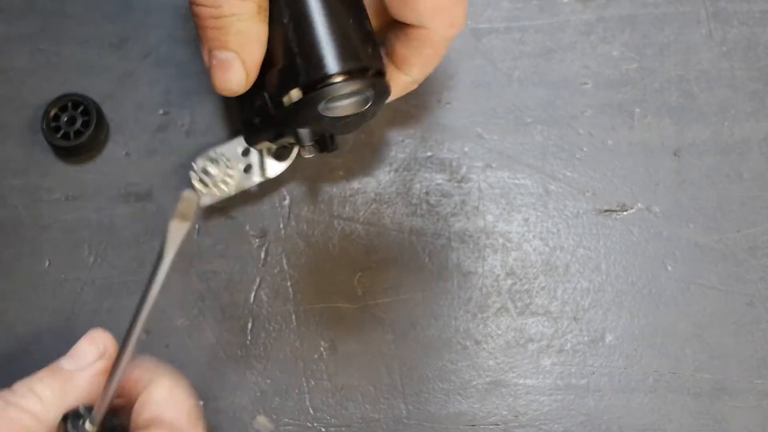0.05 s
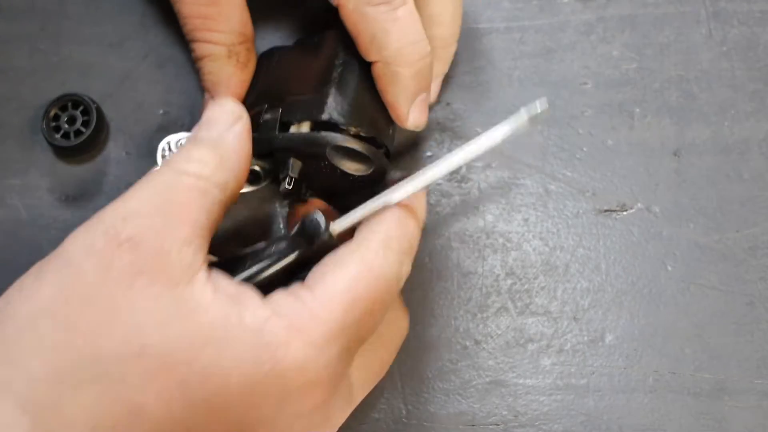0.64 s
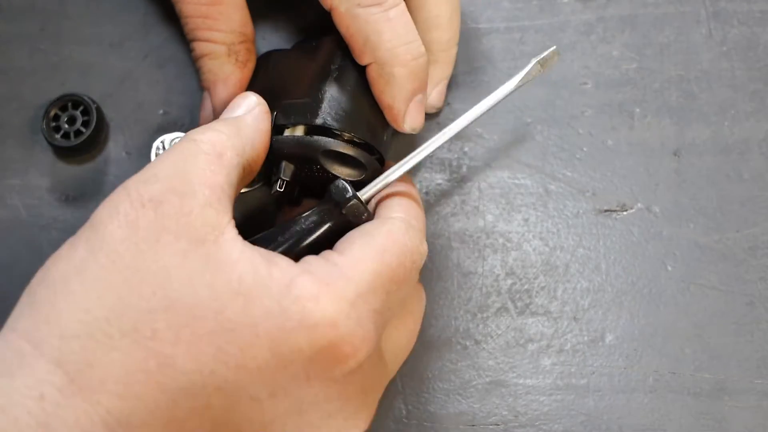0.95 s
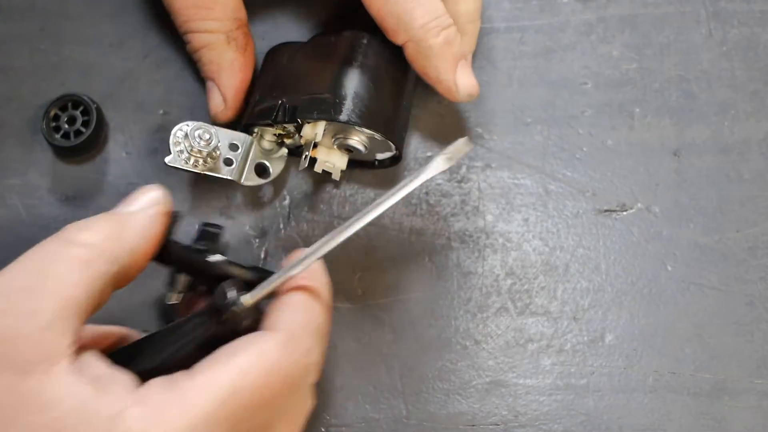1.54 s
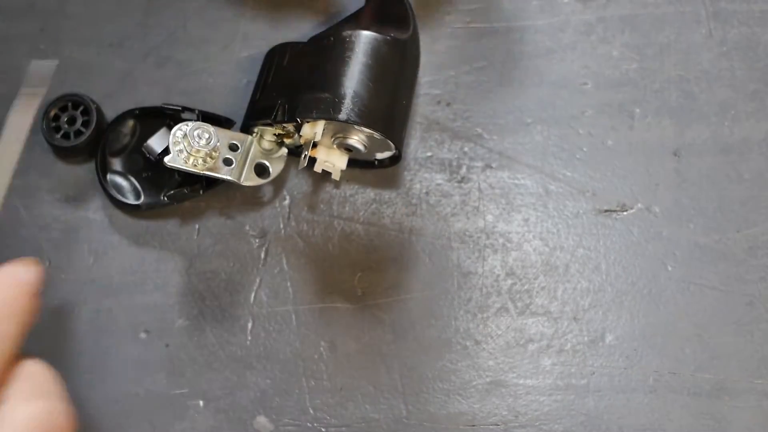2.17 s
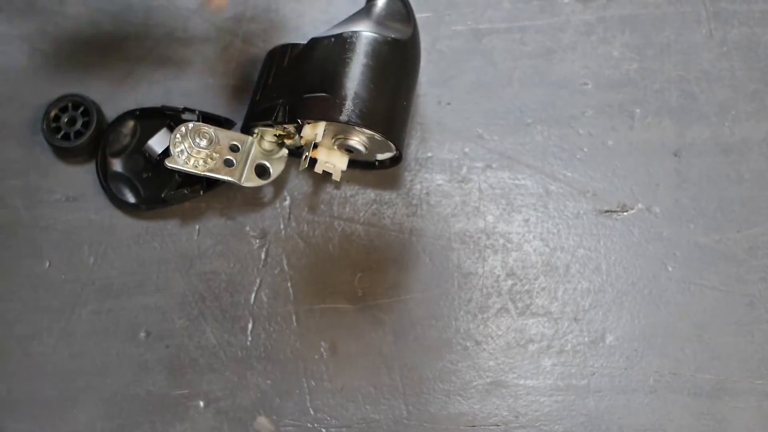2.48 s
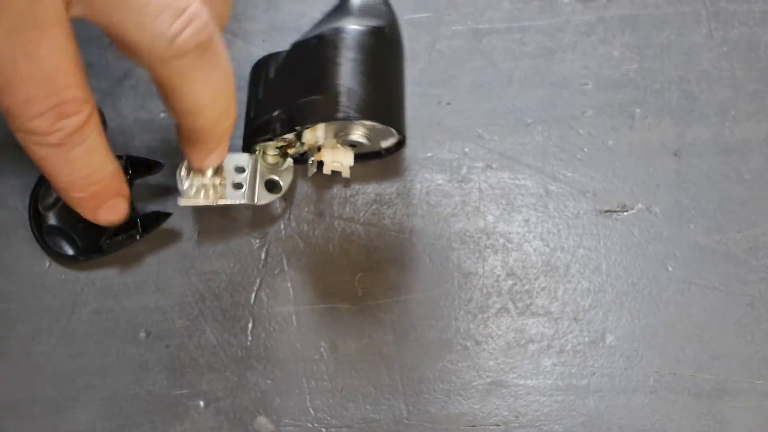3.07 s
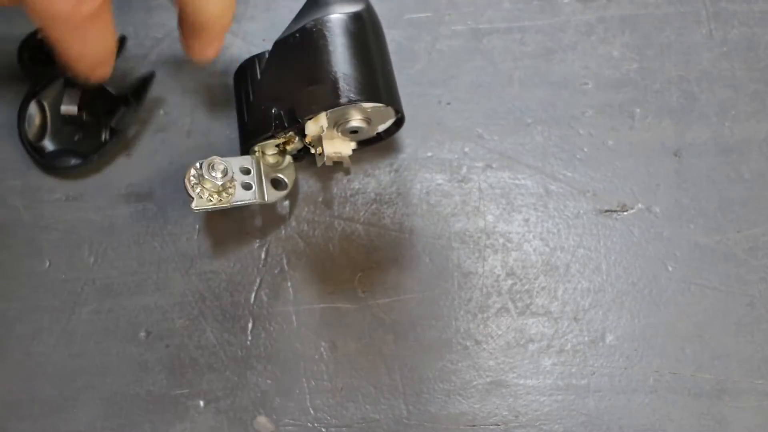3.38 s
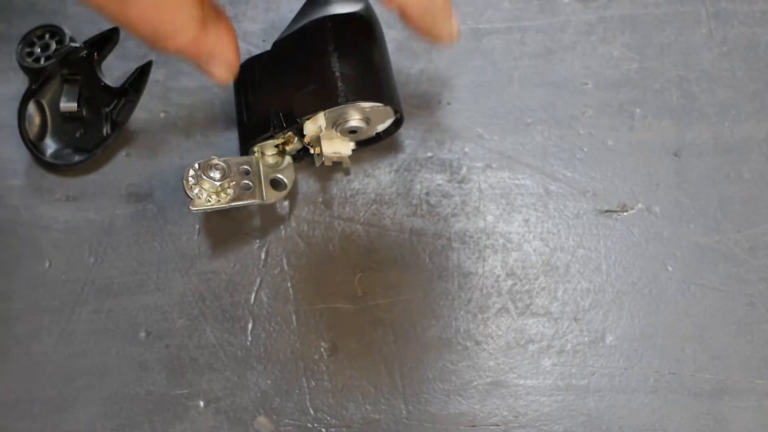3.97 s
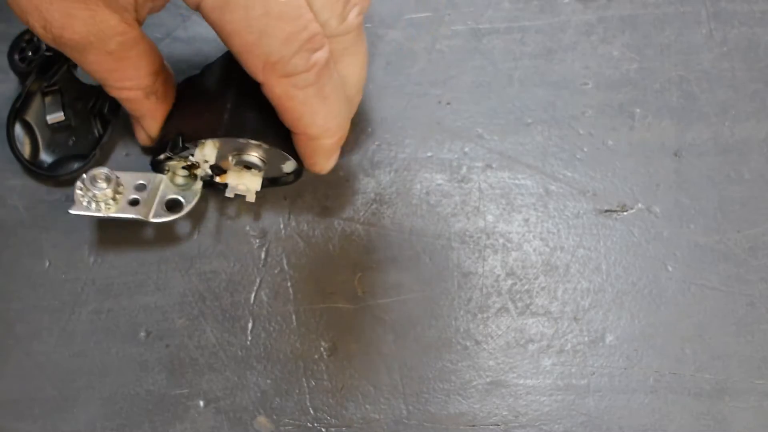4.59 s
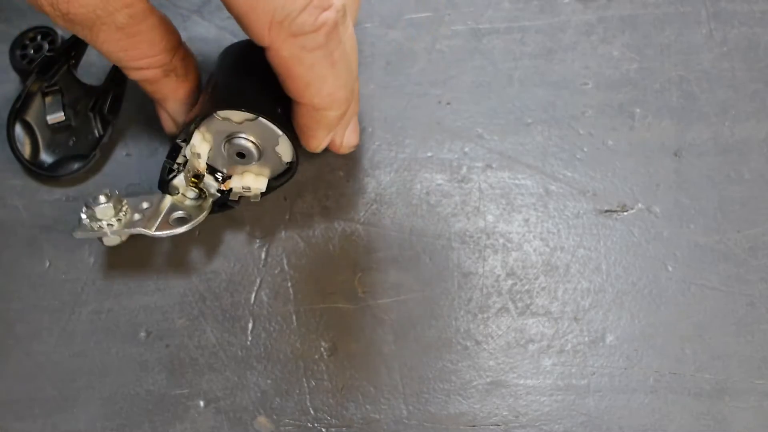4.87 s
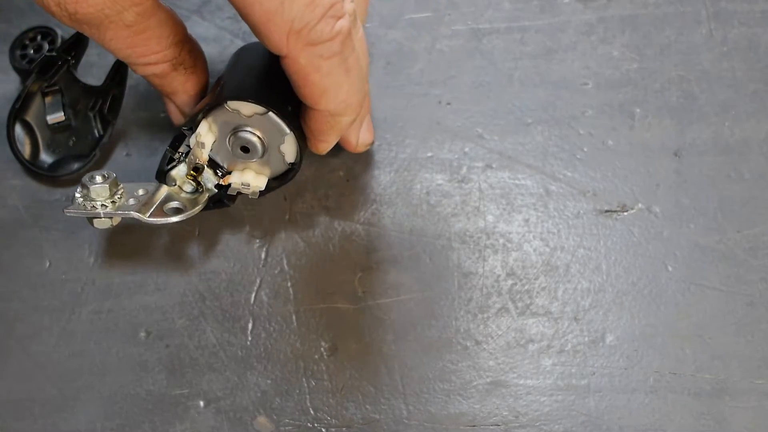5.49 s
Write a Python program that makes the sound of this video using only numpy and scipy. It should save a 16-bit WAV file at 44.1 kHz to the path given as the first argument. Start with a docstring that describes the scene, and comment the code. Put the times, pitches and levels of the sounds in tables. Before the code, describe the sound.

Soft rubbing and scraping open the sound as a small device is turned over on a workbench. It knocks firmly at about 0.3 seconds, leaving a spring inside ringing faintly, and knocks more lightly at 0.7. Around 1.1 seconds the catches of its plastic cover snap loose in a quick cluster of clicks. The cover drops at 1.8 and rattles briefly, then clacks and wobbles again from 2.7 as a finger pushes it aside. At 3 seconds a screwdriver lands with a loud clatter, its metal shaft bouncing. Its handle tumbles with dull thumps, mixed with a brushing rub and more plastic clacks, then rocks from 3.5 in quickening, fading bumps until about 4.3. A soft knock and faint scrapes follow, dying away by 5 seconds into quiet room tone. The microphone is close and the workshop small and dry.

```python
"""Prying a cover off at the workbench

A small device is turned over, knocking and scraping; a spring inside rings faintly after two knocks.
Its plastic cover is pried loose, drops and rattles. A screwdriver is put down, bounces and rocks to rest
on its handle while a finger pushes the cover aside. Each contact rings the resonances of the struck part;
hands brush the parts with a grainy rub and hiss. Close microphone, small dry workshop."""
import sys
import numpy as np
from scipy import signal
from scipy.fft import rfft, irfft
from scipy.io import wavfile
from scipy.ndimage import uniform_filter1d

SR = 44100
rng = np.random.default_rng(int(sys.argv[2]) if len(sys.argv) > 2 else 0)


def output_pcm(signal):
    """Save a mono or channel-first signal as 16-bit PCM at the path in sys.argv[1].

    Samples are clipped to [-1, 1] before scaling.
    """
    pcm = np.clip(np.atleast_2d(signal).T, -1, 1) * 32767
    wavfile.write(sys.argv[1], SR, np.round(pcm).astype(np.int16))


N = 252693
RING_TIME = np.arange(SR // 4) / SR   # seconds within one blow


def from_db(db):
    """Decibels to gain."""
    return 10 ** (np.asarray(db) / 20)


def unit_rms(x):
    """Scale to an RMS of one."""
    return x / np.sqrt(np.mean(x ** 2) + 1e-20)


def fade(t, t60):
    """Exponential decay by 60 dB in t60 seconds."""
    return np.exp(-np.log(1000) * t / t60)


def add(track, at_s, sound):
    """Mix a sound into a track at its cue."""
    start = int(round(at_s * SR))
    track[start:start + len(sound)] += sound[:N - start]


def band(x, low_hz, high_hz):
    """Causal band-pass."""
    return signal.sosfilt(signal.butter(2, [low_hz, high_hz], "band", fs=SR, output="sos"), x + 1e-18)


def noise(spectrum):
    """Steady noise of a given colour, at unit RMS."""
    hz, db = np.transpose(spectrum)
    bin_hz = np.maximum(np.arange(N // 2 + 1) * SR / N, 1)
    colour = from_db(np.interp(np.log(bin_hz), np.log(hz), db))
    return unit_rms(irfft(rfft(rng.standard_normal(N)) * colour, N))


def diffuse_tail(t60):
    """A cloud of noise that builds up and dies away; unit energy."""
    cloud = rng.standard_normal(len(RING_TIME)) * fade(RING_TIME, t60) * (1 - np.exp(-RING_TIME / .004))
    return cloud / np.linalg.norm(cloud)


# Colour of the workshop air: (frequency [Hz], relative level [dB])
AIR_COLOUR = [(15, -34), (25, -9.5), (70, 2), (97, -10.5), (134, -5.5), (277, -12.5), (384, -13.5),
              (476, -13), (962, -22), (1650, -25), (4030, -36.5), (14800, -40), (16000, -35.5)]

def room_tone(level_db=-68):
    """A quiet, steady bed of low rumble."""
    return from_db(level_db) * noise(AIR_COLOUR)


# Dark rub of skin: (frequency [Hz], relative level [dB])
RUB_COLOUR = [(71, -42.5), (120, -4.5), (220, -5.5), (269, 2.5), (414, -12), (468, -7.5), (812, -12.5),
              (1010, -13), (3000, -35.5), (3900, -43.5), (6600, -120)]
# Fine hiss of skin: (frequency [Hz], relative level [dB])
HISS_COLOUR = [(1060, -27.5), (1800, -0.5), (3230, -3.5), (3480, -4), (4210, -3.5), (5440, -8),
               (11000, -13.5), (14100, -21.5), (16000, -30.5)]
# Sliding strokes of hand or tool: (start [s], end [s], rub level [dB], hiss level [dB])
HAND_STROKES = [(0.0, 0.105, -83, -64.5), (0.07, 0.555, -63, -65), (0.513, 0.93, -58, -68),
                (1.472, 1.482, -56, -59), (1.714, 1.797, -62.5, -60.5), (1.2, 1.794, -63.5, -72),
                (1.825, 2.994, -63, -71), (2.156, 2.416, -65, -65), (3.266, 3.325, -37, -46),
                (3.322, 3.448, -43, -60.5), (3.418, 3.475, -52.5, -62), (4.359, 4.498, -55.5, -84),
                (4.484, 4.661, -63, -73.5), (4.776, 4.961, -59.5, -76)]

def hands(grip_rub_db=-68, grip_hiss_db=-76, grain_db=0.86, rest_s=4.4, rest_db_per_s=9):
    """Skin catches and slips: rub and hiss share one grain, swell with each stroke and come to rest."""
    t = np.arange(N) / SR
    activity = from_db(-rest_db_per_s * np.maximum(t - rest_s, 0))
    rub, hiss = from_db(grip_rub_db) * activity, from_db(grip_hiss_db) * activity
    for start, end, rub_db, hiss_db in HAND_STROKES:
        swell = np.sin(np.pi * np.clip((t - start) / (end - start), 0, 1))
        rub = np.hypot(rub, from_db(rub_db) * swell)
        hiss = np.hypot(hiss, from_db(hiss_db) * swell)
    grain = from_db(grain_db * unit_rms(uniform_filter1d(rng.standard_normal(N), size=300)))
    return grain * (rub * noise(RUB_COLOUR) + hiss * noise(HISS_COLOUR))


# Partials of the spring, the lowest two beating: (frequency [Hz], relative level [dB], t60 [s])
SPRING_MODES = [(336, 0, 3.4), (349, -7, 2.6), (474, -5, 1.0), (590, -3, 1.5), (624, -5, 1.2),
                (1250, -13, .5)]
# Knocks that shake it: (time [s], level [dB])
SPRING_KNOCKS = [(.317, -50.5), (1.122, -64)]

def spring():
    """A coil spring inside the device sings on after hard knocks."""
    out, t = np.zeros(N), np.arange(N) / SR
    note = sum(from_db(db) * fade(t, t60) * np.sin(2 * np.pi * hz * t) for hz, db, t60 in SPRING_MODES)
    for at_s, db in SPRING_KNOCKS:
        add(out, at_s, from_db(db) * note)
    return out


# Pings of small stiff parts: (time [s], pitch [Hz], level [dB], t60 [s])
PART_PINGS = [(.334, 4400, -44, 0.084), (.398, 4340, -44.5, 0.053), (1.1225, 3380, -23, 0.009),
              (1.154, 3380, -48, 0.016), (1.1225, 1110, -40, 0.057), (1.154, 1574, -26.5, 0.02),
              (1.417, 4400, -41, 0.012), (1.7977, 8540, -31, 0.011), (1.7977, 7900, -27.5, 0.0077),
              (1.7977, 4800, -28.5, 0.022), (1.8362, 4790, -20, 0.024), (1.837, 4260, -17.5, 0.012),
              (1.899, 2830, -37, 0.017), (1.927, 7830, -26, 0.0082), (2.7842, 4250, -30, 0.012),
              (3.4665, 4840, -37, 0.032), (4.338, 4320, -57.5, 0.035)]
# Booms of the bench top as weight settles on it: (time [s], pitch [Hz], level [dB], t60 [s])
BENCH_BOOMS = [(.179, 176, -22.5, 0.073), (.179, 94, -22.5, 0.073), (.219, 111, -31, 0.073),
               (.24, 180, -35, 0.13), (.379, 175.3, -25, 0.16), (2.785, 238.3, -30, 0.08),
               (3.2723, 119.9, -16, 0.096), (3.281, 176.3, -30.5, 0.48), (3.362, 190, -36, .07),
               (.3172, 790, -26, 0.033), (.3172, 267, -24.5, 0.12), (.7082, 790, -20, 0.02),
               (.7082, 347, -32.5, 0.041)]

def struck_modes(cues, rise_cycles=.6):
    """A ping or boom: each blow rings a single sine, which swells quickly and decays."""
    out, t = np.zeros(N), RING_TIME
    for at_s, hz, db, t60 in cues:
        envelope = (1 - np.exp(-t * hz / rise_cycles)) * fade(t, t60)
        add(out, at_s, from_db(db) * envelope * np.sin(2 * np.pi * hz * t))
    return out


def tap(modes, bench_db=-6, length=len(RING_TIME), spread_db=3.0, detune=.008, bench_echo_s=.00284):
    """A tap rings every mode, never twice alike; the wave returns inverted from the edge of the bench."""
    t = RING_TIME[:length]
    hz, width, db = np.transpose(modes)
    level_draw, pitch_draw = rng.standard_normal((2, len(hz)))
    gains = width * from_db(db + spread_db * level_draw)
    decays = np.exp(-np.minimum(np.pi * np.outer(width, t), 40))
    sines = np.sin(2 * np.pi * np.outer(hz * (1 + detune * pitch_draw), t))
    direct = gains @ (decays * sines)
    return direct - from_db(bench_db) * np.interp(t - bench_echo_s, t, direct, left=0)


# Ring of the housing's rim: (frequency [Hz], width [Hz], relative level [dB])
RIM_MODES = [(600, 150, -0.5), (830, 176, 5.5), (1280, 96, 5), (3200, 120, -11.5), (3625, 90, -22.5),
             (4220, 260, -19.5), (4900, 70, -29)]
# Drags across the bench: (start [s], end [s], level [dB], tilt [dB/octave])
HOUSING_DRAGS = [(0.0, 0.142, -64, 13), (0.124, 0.313, -64, 0), (4.532, 4.651, -63.5, 2.5),
                 (4.792, 4.952, -79, -17)]

def scrapes(slips_per_s=880):
    """The rim of the housing catches and slips on the bench; each slip rings it."""
    out, lowest_hz = np.zeros(N), RIM_MODES[0][0]
    for start, end, level_db, tilt in HOUSING_DRAGS:
        length = int((end - start) * SR)
        slips = rng.standard_normal(length) * (rng.random(length) < slips_per_s / SR)
        swell = np.sin(np.linspace(0, np.pi, length))
        rim = tap([(hz, width, db + tilt * np.log2(hz / lowest_hz)) for hz, width, db in RIM_MODES])
        scrape = signal.fftconvolve(slips * swell, rim)
        add(out, start, from_db(level_db) * scrape / np.std(scrape[:length]))
    return out


# The five registers of an impact (thud, knock, clack, click, edge) and their tails:
# (low [Hz], high [Hz], clutter send [dB], clutter t60 [s], room send [dB], room t60 [s])
IMPACT_REGISTERS = [(63, 460, -0.5, .11, -16, 0.2), (359.3, 1850, -5.5, 0.015, -6.5, 0.22),
                    (1860, 2800, -3, .02, -10.5, 0.074), (2970, 4810, -11, .031, -13, .25),
                    (5800, 14000, -2.5, .01, -8, 0.15)]
# How much hardness lifts each register, thud to edge: (share [0-1])
HARDNESS_SHARES = [0, 0.13, 0.5, 0.81, 1]

def impacts(hits, modes, colour_db, gentle_thud, echo_db, spot_db, bench_db, top_hz):
    """Contacts ring a body: hard ones click, gentle ones mostly thud; clutter and walls add tails."""
    firm_db, spot_q = -30, 1.7   # hits weaker than firm_db lean towards thud
    out, attack = np.zeros(N), int(.012 * SR)
    lowpass = signal.butter(2, top_hz, fs=SR)
    walls = [from_db(room_db) * diffuse_tail(room_t60) for *_, room_db, room_t60 in IMPACT_REGISTERS]
    for at_s, strength_db, hardness_db, spot_hz in hits:
        body = signal.lfilter(*lowpass, tap(modes, bench_db))
        blow = 0
        for k, (low_hz, high_hz, clutter_db, clutter_t60, _, _) in enumerate(IMPACT_REGISTERS):
            direct = (-1) ** k * band(body, low_hz, high_hz)   # alternate signs: bands join with no notch
            level_db = strength_db + colour_db[k] + HARDNESS_SHARES[k] * hardness_db
            if k == 0:
                level_db += gentle_thud * (firm_db - strength_db)
            echoes = from_db(echo_db) * (from_db(clutter_db) * diffuse_tail(clutter_t60) + walls[k])
            layer = direct + signal.fftconvolve(direct, echoes)[:len(RING_TIME)]
            blow = blow + from_db(level_db) * layer / np.std(layer[:attack])
        spot = signal.lfilter(*signal.iirpeak(spot_hz, spot_q, fs=SR), blow)   # pitch of the struck spot
        add(out, at_s, blow + from_db(spot_db) * spot)
    return out


# Voice of the housing: (frequency [Hz], width [Hz], relative level [dB])
HOUSING_MODES = [(75.5, 17, -0.5), (118, 15, -3.5), (187, 31, 7.5), (286, 70, 8.5), (341, 44, 12),
                 (480.5, 16, 5), (641, 47, 10.5), (790, 160, 10), (950, 130, -1), (1110, 100, 6),
                 (1361, 58, 1), (1556, 290, -5.5), (1880, 290, -9.5), (2384, 224, -7.5), (3160, 290, -4.5),
                 (3740, 200, -9), (4343, 490, -2), (4400, 39, -14.5), (7860, 3900, -4.5),
                 (13080, 8500, -8.5)]
# Knocks and snapping catches: (time [s], strength [dB], hardness [dB], spot pitch [Hz])
HOUSING_KNOCKS = [(.179, -51, 3, 550), (.204, -55, 17.5, 1240), (.317, -20, -12, 454), (.332, -43, 12, 600),
                  (.377, -42, -8, 185), (.391, -49.5, 14.5, 3200), (.708, -32.5, -12.5, 450),
                  (1.122, -31.5, -2.5, 3200), (1.141, -36.5, 0, 1130), (1.1535, -36, 4.5, 3200),
                  (1.186, -46, 6.5, 3350), (1.233, -56.5, 8, 295), (1.41, -40.5, -26, 470),
                  (1.653, -64.5, -21, 260), (1.679, -69.5, 13.5, 706), (4.3375, -48, -27, 700)]

def housing():
    """The device knocks on the bench and its catches let go, ringing the housing."""
    return impacts(HOUSING_KNOCKS, HOUSING_MODES, colour_db=[-6.5, -0.5, -11.5, -14.0, -21],
                   gentle_thud=0.58, echo_db=5.0, spot_db=-1.5, bench_db=-14.5, top_hz=17000)


# Voice of the plastic cover: (frequency [Hz], width [Hz], relative level [dB])
COVER_MODES = [(152, 39, -19.5), (260, 110, 4.5), (587, 37, 4), (830, 170, 6), (1090, 38, 4),
               (1300, 330, 6.5), (1637, 79, 1.5), (2130, 320, -3.5), (2784, 200, -4), (3150, 240, -4),
               (3650, 90, -3), (4050, 88, -6.5), (4420, 130, -5.5), (4857, 80, 2.5), (5460, 130, -16),
               (6743, 200, -13), (7400, 560, -7.5), (8600, 260, -4.5), (9410, 220, -2), (10100, 530, -9.5),
               (12300, 680, -14.5), (14530, 2500, -18)]
# Its clacks on the bench: (time [s], strength [dB], hardness [dB], spot pitch [Hz])
COVER_CLACKS = [(1.7975, -39.5, 3, 12190), (1.836, -43, 12.5, 4400), (1.851, -37.5, -18, 940),
                (1.8768, -39.5, -6.5, 964), (1.8948, -41, -1, 1090), (1.899, -45, 13, 3080),
                (1.927, -40, 3.5, 900), (1.9437, -53, 0, 900), (1.949, -55.5, 13, 920),
                (1.9555, -47.5, -8, 1010), (1.965, -45.5, -6.5, 3240), (1.9837, -59.5, 12.5, 1600),
                (2.723, -32, -10, 2480), (2.767, -56, 6, 11020), (2.7745, -37, -10, 1410),
                (2.7946, -44.5, -12.5, 1494), (2.8285, -47, -6, 1189), (2.8475, -34, -0.5, 2300),
                (2.87, -49, 1, 8300), (2.888, -43, -2, 2410), (2.905, -45.5, -4.5, 9680),
                (2.915, -41, -8.5, 1997), (3.261, -41.5, -2.5, 4050), (3.444, -43, -16, 2097),
                (3.4665, -36.5, -3, 2383), (3.487, -51, -1, 1406), (3.502, -46, -6, 1900),
                (3.5134, -55, 3.5, 8200)]

def cover():
    """The loose cover clacks as it falls, tips over and is pushed aside."""
    return impacts(COVER_CLACKS, COVER_MODES, colour_db=[-18, -5.0, -10.0, -7.5, -15.5],
                   gentle_thud=0.45, echo_db=4.5, spot_db=3.5, bench_db=-15, top_hz=17000)


# Wobbles of the cover:
# (start [s], end [s], first rate [taps/s], last rate [taps/s], first level [dB], last level [dB])
COVER_WOBBLES = [(1.975, 2.032, 140, 166, -45.5, -66.5), (2.734, 2.848, 96, 160, -50, -56.5),
                 (2.86, 2.953, 79, 160, -49.5, -54.5), (3.476, 3.558, 110, 130, -46, -58.5)]

def cover_chatter(band_hz=(500, 2200), spread_db=2.5, jitter=.15, room_db=-1.0):
    """The light cover wobbles on its rim in quickening, fading taps, then lies still."""
    out = np.zeros(N)
    soften = signal.butter(1, band_hz, "band", fs=SR)
    for start, end, first_rate, last_rate, first_db, last_db in COVER_WOBBLES:
        at_s = start
        while at_s < end:
            rate = np.interp(at_s, [start, end], [first_rate, last_rate])
            level_db = np.interp(at_s, [start, end], [first_db, last_db])
            level_db += spread_db * rng.standard_normal()
            tick = signal.lfilter(*soften, tap(COVER_MODES, length=SR // 16))
            add(out, at_s, from_db(level_db) * tick / np.linalg.norm(tick) * np.sqrt(SR / rate))
            at_s += (1 + jitter * rng.uniform(-1.3, 1)) / rate
    return out + from_db(room_db) * signal.fftconvolve(out, diffuse_tail(t60=.2))[:N]


# Voice of the screwdriver's handle: (frequency [Hz], width [Hz], relative level [dB])
HANDLE_MODES = [(76, 33, -16), (126, 22.1, -34), (176, 10, -2), (239, 40, 3), (299.7, 9.8, 10),
                (350, 61, 9.5), (670, 190, 3.5), (862, 110, 2), (1130, 80, 2), (2440, 250, -5.5),
                (4250, 560, 1.5), (7360, 7400, -8)]
# Its tumbling bumps: (time [s], strength [dB], hardness [dB], spot pitch [Hz])
HANDLE_BUMPS = [(3.2, -44.5, -10, 500), (3.213, -41.5, -9, 704), (3.245, -42, 7, 330),
                (3.2723, -30.5, -20, 940), (3.2875, -37, 12.5, 677), (3.295, -39.5, 5, 10440),
                (3.301, -59, 20.5, 11000), (3.312, -45, -1, 300), (3.368, -51.5, 8, 340),
                (3.392, -45.5, 4, 850), (3.398, -46, 14, 1100)]

def handle_tumble():
    """The handle tumbles over the bench with dull bumps."""
    return impacts(HANDLE_BUMPS, HANDLE_MODES, colour_db=[4.5, -2.5, -42, -18.5, -24],
                   gentle_thud=0.021, echo_db=4.5, spot_db=3.0, bench_db=-19, top_hz=8500)


def handle_rocking(start_s=3.485, swings=9, first_swing_s=.151, shrink=.861):
    """The handle rocks edge to edge in ever shorter, weaker swings; each touch makes the bench boom."""
    first_db, swing_loss_db, hardness_db, spot_hz = -55.5, 2, -11, 600
    far_share, far_loss_db = 0.29, 2.5   # the far edge touches this far into a swing, more softly
    boom_hz, boom_lift_db, boom_t60 = 238.3, 22, 0.13
    hits, at_s = [], start_s
    for k in range(swings):
        swing_s, db = first_swing_s * shrink ** k, first_db - swing_loss_db * k
        hits.append((at_s, db, hardness_db, spot_hz))
        hits.append((at_s + far_share * swing_s, db - far_loss_db, hardness_db, spot_hz))
        at_s += swing_s
    touches = impacts(hits, HANDLE_MODES, colour_db=[4.0, -1.5, -23, -33, -41],
                      gentle_thud=0.1, echo_db=4.5, spot_db=2.5, bench_db=-4.5, top_hz=8480)
    booms = struck_modes([(at_s, boom_hz, db + boom_lift_db, boom_t60) for at_s, db, *_ in hits])
    return touches + booms


# Voice of the screwdriver's shaft: (frequency [Hz], width [Hz], relative level [dB])
SHAFT_MODES = [(173, 40, -5.5), (343, 86, -3.5), (610, 190, 1.5), (855, 90, 1), (1090, 50, 4),
               (1209, 12, -2.5), (1280, 93, 2), (1450, 140, 6.5), (1590, 300, -5.5), (1700, 60, -5),
               (2070, 140, -2), (2087, 40, -6.5), (2330, 130, 2.5), (2617, 47, -11.5), (2952, 250, -12.5),
               (3450, 190, -12), (3870, 220, -11), (4240, 180, -15.5), (5500, 500, -21),
               (7300, 1600, -15.5)]
# Its landing and bounces: (time [s], strength [dB], hardness [dB], spot pitch [Hz])
SHAFT_BOUNCES = [(3.0123, -16, -1.5, 1760), (3.048, -22.5, 4.5, 2300), (3.066, -24, -9.5, 1230),
                 (3.084, -29.5, -0.5, 900), (3.0875, -38.5, 10, 3900), (3.094, -35, -9, 1200),
                 (3.0985, -38, 5.5, 3900), (3.105, -48, 14.5, 4000), (3.154, -33.5, -36, 1250),
                 (3.184, -36.5, -33, 1230)]

def screwdriver_landing():
    """The screwdriver lands hard and bounces, ringing its shaft."""
    return impacts(SHAFT_BOUNCES, SHAFT_MODES, colour_db=[-12, 0.0, -8, -13.0, -39],
                   gentle_thud=0.17, echo_db=5.0, spot_db=-5, bench_db=-9.0, top_hz=8070)


def scene(shimmer_db=-39, shimmer_treble_db=21, hiss_db=-77):
    """Everything sits dead centre; a faint, bright left-right shimmer and hiss give slight width."""
    device = housing() + spring() + scrapes() + cover() + cover_chatter()
    screwdriver = screwdriver_landing() + handle_tumble() + handle_rocking()
    accents = struck_modes(PART_PINGS) + struck_modes(BENCH_BOOMS)
    middle = device + screwdriver + accents + hands() + room_tone()
    bright = middle + from_db(shimmer_treble_db) * band(middle, 4500, 15000)
    shimmer = from_db(shimmer_db) * signal.fftconvolve(bright, diffuse_tail(t60=.03))[:N]
    hiss = from_db(hiss_db) * rng.standard_normal((2, N))
    return middle + shimmer * [[1], [-1]] + hiss


def record(dry, ceiling=.9, cutoff_hz=16000):
    """Peaks are clipped at the ceiling, then the top end is cut steeply."""
    lowpass = signal.ellip(10, .1, 80, cutoff_hz, fs=SR, output="sos")
    return signal.sosfilt(lowpass, np.clip(dry, -ceiling, ceiling))


dry = scene()
out = record(dry)
output_pcm(out)
```